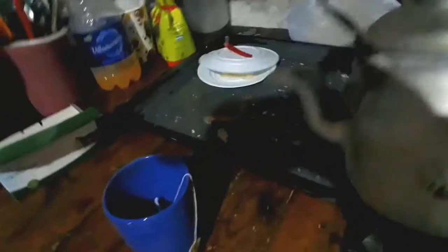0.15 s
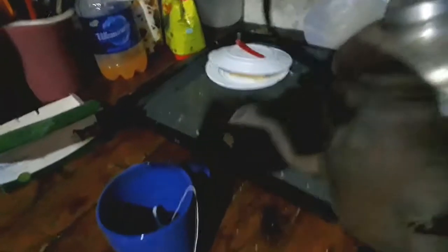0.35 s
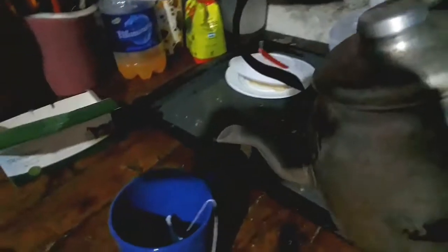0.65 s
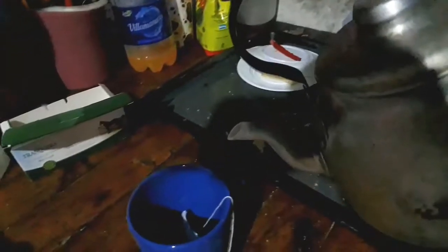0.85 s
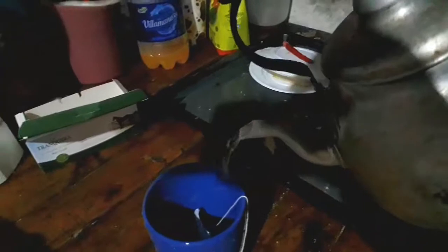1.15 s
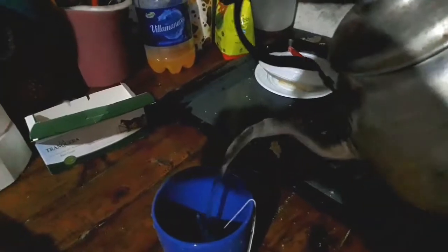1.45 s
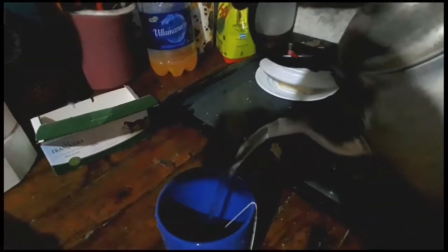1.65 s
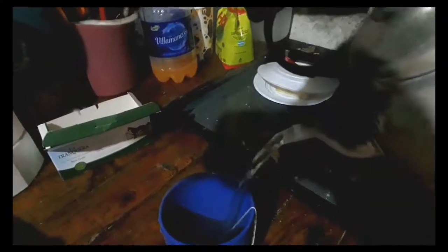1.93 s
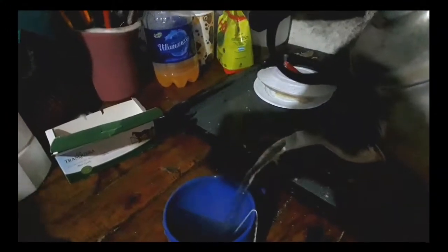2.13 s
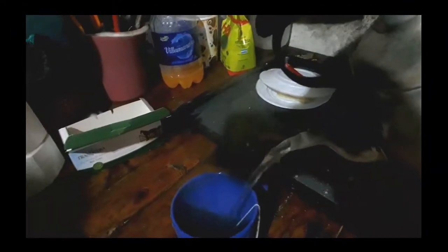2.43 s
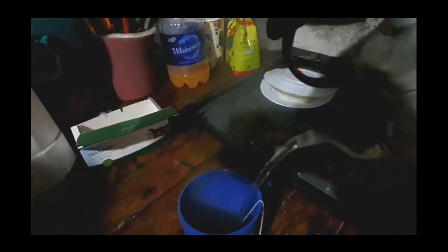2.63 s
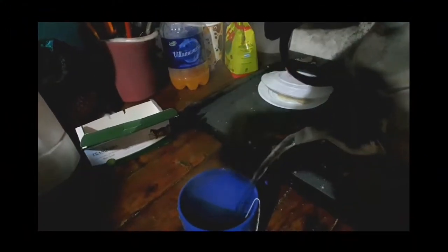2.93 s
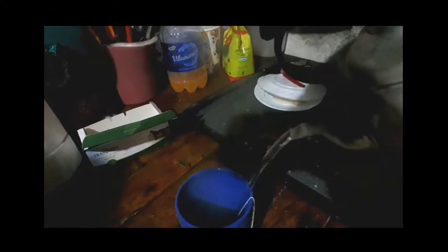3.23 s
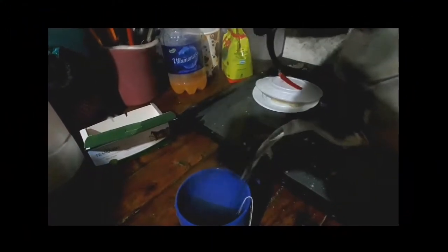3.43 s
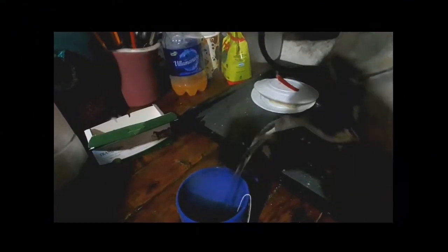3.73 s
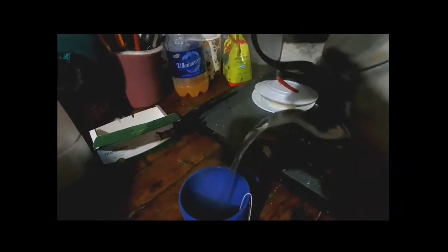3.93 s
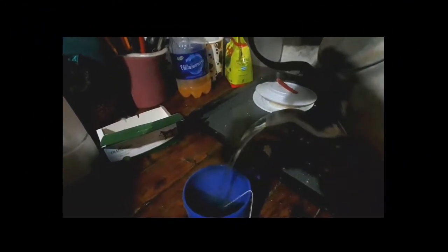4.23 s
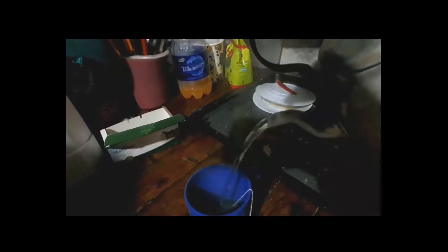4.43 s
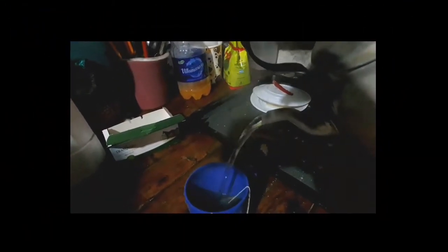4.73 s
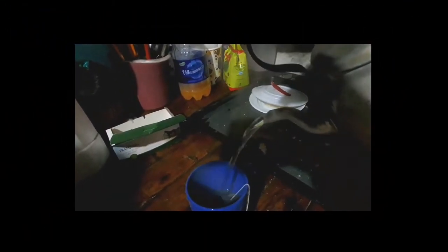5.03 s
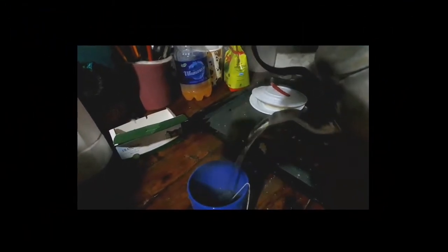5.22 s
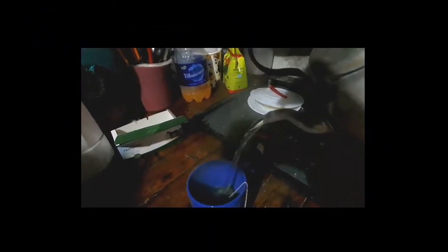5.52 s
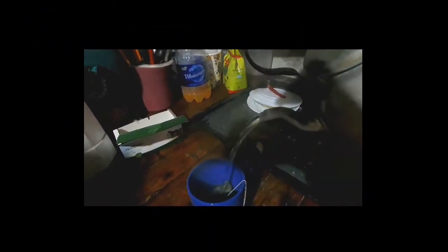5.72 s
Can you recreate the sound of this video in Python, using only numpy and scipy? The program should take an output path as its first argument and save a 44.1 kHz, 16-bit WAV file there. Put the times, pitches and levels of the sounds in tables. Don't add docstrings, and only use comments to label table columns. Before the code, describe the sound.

A small kitchen under steady rain for about six seconds, heard by one microphone with the same sound on both sides. The rain is a broad, fairly dull wash with low boxy room colour, easing and picking up slightly. A faint bright seethe from the kettle swells until 0.4 s and stops quickly. From 0.5 s the lid and handle tap the thin metal wall; blows crowd together from 0.7 to 1.0 s, hardest at 0.92 and 0.96, with small knocks until 1.23. They ring bright and very short, with a low double slosh near 0.8. From about 1.2 to 1.5 s pouring builds into a very quiet bubbly fizz that continues. A soft steam puff comes at 2.1-2.3 s. Tiny drops tick at 2.3 and 2.6, sharper at 3.5, 4.0 and 4.6, and again at the end. At 3.8-4.2 s a bird outside calls once, hoarse, rising, clearer, then breaking and falling.

```python
import sys
import numpy as np
from scipy import signal
from scipy.fft import rfft, irfft
from scipy.io import wavfile
from scipy.ndimage import uniform_filter1d

SR = 44100
rng = np.random.default_rng(int(sys.argv[2]) if len(sys.argv) > 2 else 0)


def put_to_file(sound):
    columns = np.atleast_2d(sound).T
    safe = np.clip(columns, -1, 1)
    whole_steps = np.round(safe * 32767)
    wavfile.write(sys.argv[1], SR, whole_steps.astype(np.int16))


def ratio_of_db(decibels):
    return 10 ** (np.asarray(decibels, float) / 20)


N = 258867


def evened(x):
    return x / np.sqrt(np.mean(x ** 2) + 1e-20)


def read(points, hz):
    f, value = np.transpose(points)
    return np.interp(np.log(hz + 1), np.log(f + 1), value)


def add(mix, start_s, sound):
    part = mix[round(start_s * SR):][:len(sound)]
    part += sound[:len(part)]


def coloured(x, points):
    hz = np.fft.rfftfreq(len(x), 1 / SR)
    return irfft(rfft(x) * ratio_of_db(read(points, hz)), len(x))


def wander(length, hz):
    return evened(signal.lfilter(*signal.butter(N=2, Wn=hz, fs=SR), rng.standard_normal(length)))


# f/Hz, level/dB [per Hz]
RAIN_SPECTRUM = [(20, -31.5), (45, -26), (65, -12.5), (110, -8), (260, -6), (420, -8), (520, -4),
                 (580, -1.5), (1600, -1), (2300, -5.5), (3800, -15), (8400, -17), (9500, -24.5),
                 (15700, -31.5)]
# f/Hz, width/Hz, level/dB
ROOM_MODES = [(69.2, 12, -0.5), (96, 17, 4.5), (142, 16, 11.5), (156.4, 7.1, -7), (185.3, 7.5, 6),
              (211.7, 13.2, 9), (788, 43, 2), (4970, 350, -0.5), (7000, 980, 2.5), (8800, 400, 0.5),
              (9570, 470, -3.5)]
# t/s, level/dB
RAIN_LEVEL = [(0, -36), (.4, -36), (1, -36.5), (1.27, -37.5), (1.45, -36.5), (2.5, -37), (3.68, -37.9),
              (3.95, -37), (4.4, -36.5), (5.87, -36.5)]


def rain(patchy_db=0.9, flicker_db=0.8):
    seethe_db, seethe_top_s, seethe_rise_s, seethe_fall_s = 2.5, 0.39, 0.4, 0.062
    size, hop = 4096, 1024
    frames = (N // 512 + 16) // 2
    hz = np.fft.rfftfreq(size, 1 / SR)[:, None]
    t = np.arange(frames) * hop / SR
    real, imag, patches = rng.standard_normal((frames, len(hz), 3)).T
    patches = uniform_filter1d(patches, size=40, axis=0)
    patches = evened(uniform_filter1d(patches, size=4, axis=1))

    colour_db = read(RAIN_SPECTRUM, hz)
    for f, width_hz, db in ROOM_MODES:
        colour_db = colour_db + db / (1 + (2 * (hz - f) / width_hz) ** 2)

    treble = 1 / (1 + (2800 / (hz + 1)) ** 4)
    gusts = evened(uniform_filter1d(rng.standard_normal(frames), size=2))
    slope_s = np.where(t < seethe_top_s, seethe_rise_s, seethe_fall_s)
    seethe = seethe_db * np.exp(-((t - seethe_top_s) / slope_s) ** 2)
    swell_db = treble * (seethe + flicker_db * gusts)

    z = (real + 1j * imag) * ratio_of_db(colour_db + patchy_db * patches + swell_db)
    wash = evened(signal.istft(z, nperseg=size, noverlap=size - hop)[1][:N])
    s, level_db = np.transpose(RAIN_LEVEL)
    return wash * ratio_of_db(np.interp(np.arange(N) / SR, s, level_db) + 1.5)


# t/s, f/Hz, level/dB, hoarseness [0-1]
CALL = [
    (3.805, 1785, -44, 0.7),
    (3.845, 1800, -31, 0.54),
    (3.878, 1824, -38.5, .7),
    (3.895, 2032, -37, 0.62),
    (3.97, 2165, -35, .38),
    (4.02, 2185, -34.5, 0.35),
    (4.09, 2190, -34, .5),
    (4.125, 2080, -30, 1.01),
    (4.205, 1865, -55, 1.22),
]
PARTIALS_DB = [3.5, 0, -9.5, -10, -20]


def bird():
    open_hz, open_span_hz = 2060, 30
    shut_first_db, open_first_db = -13, -6
    clear_upper_db, hoarse_upper_db, low_upper_db = -8.5, 0.5, 7
    s, *columns = np.transpose(CALL)
    t = np.arange(s[0], s[-1], 1 / SR)
    hz, db, hoarse = (np.interp(t, s, c) for c in columns)
    hoarse = np.clip(hoarse, 0, 1)

    opened = 1 / (1 + np.exp((open_hz - hz) / open_span_hz))
    first_db = shut_first_db + (open_first_db - shut_first_db) * opened
    upper_db = clear_upper_db + (hoarse_upper_db - clear_upper_db) * hoarse
    upper_db = upper_db + low_upper_db * (1 - np.maximum.accumulate(opened))
    lifts_db = [first_db, 0 * t, upper_db, upper_db, upper_db]
    least_rough = [0, 0, 0.95, 0.6, 0.6]
    turns = np.cumsum(hz * (1 + 0.011 * wander(len(t), hz=120))) / SR

    voice = 0
    for k, lift_db in enumerate(lifts_db):
        n = k + 1
        clear = 1 + 0.25 * wander(len(t), hz=60)
        narrow_hz, wide_hz = 130 * n ** 0.48, 300 * n ** 0.3
        narrow = wander(len(t), narrow_hz) + 1j * wander(len(t), narrow_hz)
        wide = wander(len(t), wide_hz) + 1j * wander(len(t), wide_hz)
        rasp = (1 - hoarse ** 2) * narrow + hoarse ** 2 * wide
        rasp = rasp * np.exp(-2j * np.pi * 0.035 * n * turns)
        rough = np.maximum(hoarse, least_rough[k])
        rasp_gain = 0.35 if k == 0 else 1
        blend = np.sqrt(1 - rough) * clear + np.sqrt(rough / 2) * rasp * rasp_gain
        partial = blend * np.exp(2j * np.pi * n * turns)
        voice = voice + ratio_of_db(PARTIALS_DB[k] + lift_db) * partial.real
    out = np.zeros(N)
    add(out, s[0], np.sqrt(2) * ratio_of_db(db) * voice)
    return out


# f/Hz, level/dB
HISS_SPECTRUM = [(2000, -30), (4000, -3), (6000, -2.5), (7500, 4.5), (8800, -4.5), (9600, -7.5),
                 (13000, -8), (15500, -11)]


def puff():
    start_s, attack_s, hold_s, release_s = 2.06, 0.09, 0.048, 0.085
    level_db, fade_db = -41, -20
    corners_s = start_s + np.cumsum([0, attack_s, hold_s, release_s])
    hiss = evened(coloured(rng.standard_normal(N), HISS_SPECTRUM))
    shape_db = np.interp(np.arange(N) / SR, corners_s, [fade_db, 0, 0, fade_db], left=-80, right=-80)
    return hiss * ratio_of_db(level_db + shape_db)


def stream(per_s=500, spread_db=2.5, level_db=-62):
    out = np.zeros(N)
    gate = np.clip((np.arange(N) / SR - 1.2) / 0.27, 0.25, 1)
    for hz in np.geomspace(1500, 13000, num=20):
        burst_gain = ratio_of_db(spread_db * np.minimum(rng.exponential(1, N), 5))
        bursts = burst_gain * (rng.random(N) < per_s / 20 / SR)
        turns = np.arange(0, 8, hz / SR)
        blip = np.sin(2 * np.pi * turns * (1 + 0.05 * turns)) * turns * np.exp(-turns / 1.1)
        out += signal.oaconvolve(bursts, blip * (hz / 3000) ** -0.8)[:N]
    return ratio_of_db(level_db) * evened(out) * gate


# t/s, peak level/dB, f/Hz, ring/ms, tick over ring/dB
SPITS = [(.133, -32, 5500, 1.2, -7), (2.304, -35.5, 7000, .6, 9), (2.323, -40, 13000, .6, 7),
         (2.601, -33, 6860, 1.1, -9), (3.519, -20.5, 5530, .7, -15), (3.583, -33, 8000, .4, 0.5),
         (3.985, -21, 5900, 0.96, -11), (3.986, -23, 7510, 1.07, -20), (4.579, -25.5, 7240, 1.5, -8),
         (4.708, -35, 13000, .6, -1), (4.758, -29.5, 10000, .4, -5), (5.846, -36, 7500, 0.78, -10),
         (5.85, -26.5, 7000, 0.58, -3.5)]


def spits():
    out, t = np.zeros(N), np.arange(512) / SR
    for s, db, hz, ring_ms, tick_db in SPITS:
        ring = np.sin(2 * np.pi * hz * t) * np.exp(-t * 1000 / ring_ms)
        tick = evened(coloured(rng.standard_normal(len(t)), HISS_SPECTRUM)) * np.exp(-t / 0.00114)
        attack = np.minimum(t / 0.00032, 1)
        add(out, s, ratio_of_db(db) * (ring + ratio_of_db(tick_db) * tick) * attack)
    return out


# f/Hz, level/dB, t60/s
WALL_MODES = [(3060, 0, 0.13), (3430, 1, 0.11), (4090, 4.5, 0.0705), (4300, -15, .07), (5100, -18, .07),
              (5420, 0, .09), (6050, 5.5, 0.06), (6360, -8, .07), (7000, 2, 0.094), (8600, -13, 0.045),
              (8800, -19, 0.046)]
# f/Hz, level/dB [per Hz]
SCRAPE_SPECTRUM = [(1500, -19), (2600, -3), (3100, 4.5), (7000, -1), (8800, -2), (9600, -16), (12000, -16),
                   (15500, -42)]


def rattle(peak_db, low_hz, high_hz, tilt_db):
    t = np.arange(8192) / SR
    t60 = 0.042 * (3200 / low_hz) ** 0.7
    luck, split, phase = rng.standard_normal((len(WALL_MODES) + 2, 3)).T
    modes = []
    for (f, db, ring_s), k in zip(WALL_MODES, luck):
        modes.append((f, db - 10 + 2.7 * k + tilt_db * (f > 4700), ring_s))
    modes += [(low_hz, 3, 0.07), (high_hz, tilt_db, 0.05)]

    ring = 0
    for (f, mode_db, ring_s), apart, start in zip(modes, split, phase):
        pair = np.sin(2 * np.pi * f * t + 3 * start)
        pair = pair + 0.43 * np.sin(2 * np.pi * f * (1 + 0.025 * apart) * t)
        ring = ring + ratio_of_db(mode_db - 60 * t / (ring_s * t60 / 0.092)) * pair

    tilted = [(f, db + 0.89 * tilt_db * (f > 4700)) for f, db in SCRAPE_SPECTRUM]
    scrape = coloured(rng.standard_normal(len(t)), tilted) * ratio_of_db(-60 * t / t60)
    contact = coloured(rng.standard_normal(len(t)), HISS_SPECTRUM) * ratio_of_db(-60 * t / 0.029)

    sound = evened(ring) + ratio_of_db(-1.5) * evened(scrape) + ratio_of_db(-16) * evened(contact)
    sound = sound * np.sin(np.minimum(t / 0.0014, 1) * np.pi / 2) ** 2
    sound = sound * ratio_of_db(-5 * np.exp(-t / 0.0026))
    loudest = np.sqrt(uniform_filter1d(sound ** 2, size=130).max())
    return ratio_of_db(peak_db - 10) * sound / loudest


# t/s, peak level/dB, lower ring f/Hz, upper ring f/Hz, upper over lower/dB
RATTLES = [(0.4908, -28, 3080, 5350, 0), (0.5222, -23.5, 3020, 5600, 6), (0.7174, -19.5, 3950, 6920, -8),
           (0.749, -25, 2920, 6480, -25), (0.823, -21, 2910, 6300, 6), (0.85, -24.5, 2953, 5420, -2),
           (0.8813, -31, 2860, 5440, -6), (0.8901, -15.5, 2870, 5340, 8), (0.9151, -7.5, 3450, 5460, 2),
           (0.9195, -20.5, 3376, 5440, -5.5), (0.9312, -23, 3530, 5620, -4), (0.9444, -16.5, 3110, 7110, 4),
           (0.9582, -9.5, 3950, 6050, 10.5), (0.9668, -21, 4060, 6660, -4), (1, -24, 4000, 7100, 0),
           (1.1556, -14.5, 4330, 6400, 1), (1.1664, -24, 3020, 4960, -10), (1.2306, -25.5, 3060, 5570, 1)]
# t/s, level/dB, f/Hz, t60/s
SLOSH = [
    (.786, -30.5, 306, 0.15),
    (.8, -32, 372.6, 0.17),
]


def kettle():
    out, t = np.zeros(N), np.arange(12000) / SR
    for s, *blow in RATTLES:
        add(out, s, rattle(*blow))
    for s, db, hz, t60 in SLOSH:
        add(out, s, ratio_of_db(db - 60 * t / t60) * np.minimum(t / 0.005, 1) * np.sin(2 * np.pi * hz * t))
    return out


def kitchen(x, t60=0.37):
    taps = np.zeros(SR // 2)
    at = np.arange(100, len(taps) - 20, 20)
    signs = rng.choice([-1., 1.], len(at))
    taps[at + rng.integers(0, 20, len(at))] = signs * ratio_of_db(-60 * at / SR / t60)
    return signal.fftconvolve(x, taps / np.linalg.norm(taps))[:N]


def scene():
    far = bird()
    near = spits() + kettle()
    echoes = kitchen(ratio_of_db(-10.0) * near + ratio_of_db(-6.0) * far)
    mix = rain() + puff() + stream() + far + near + echoes
    return np.array([mix, mix])


def top_cut(x):
    return signal.sosfilt(signal.butter(12, 16640, fs=SR, output="sos"), x)


def record(dry):
    edge_hz, offset = 15500, -0.0006
    lowpass = signal.firwin(601, edge_hz, window=("kaiser", 6), fs=SR)
    limited = signal.oaconvolve(dry, lowpass[None], "same")
    return top_cut(limited + offset)


dry = scene()
out = record(dry)
put_to_file(out)
```